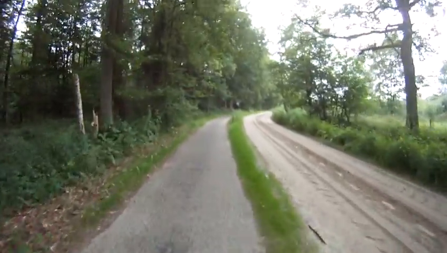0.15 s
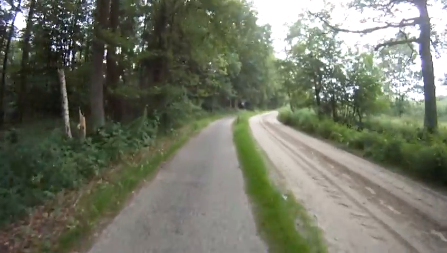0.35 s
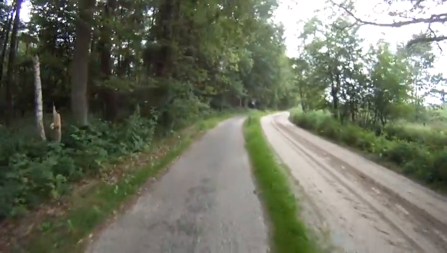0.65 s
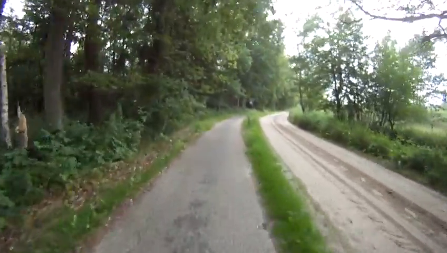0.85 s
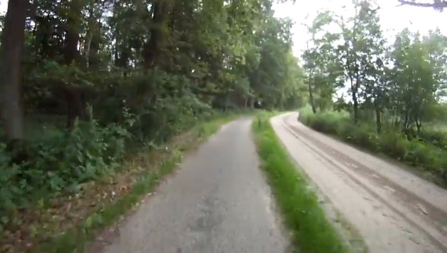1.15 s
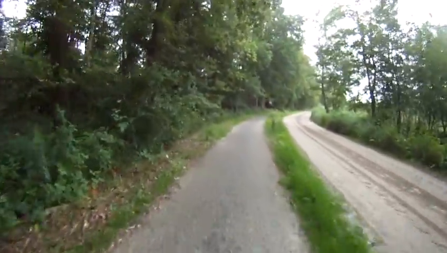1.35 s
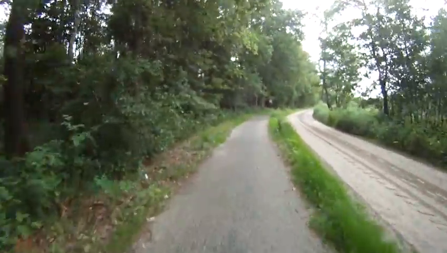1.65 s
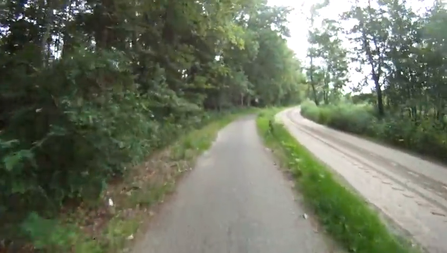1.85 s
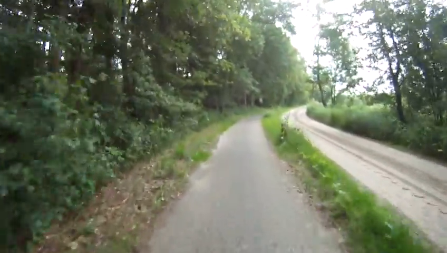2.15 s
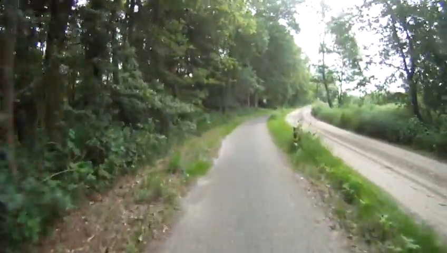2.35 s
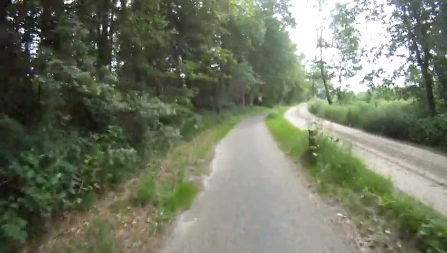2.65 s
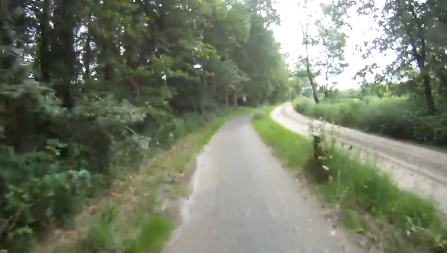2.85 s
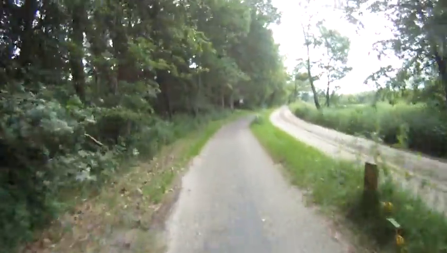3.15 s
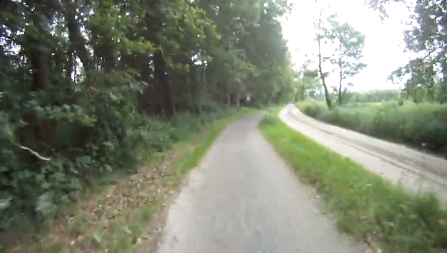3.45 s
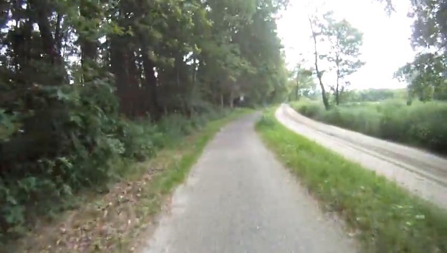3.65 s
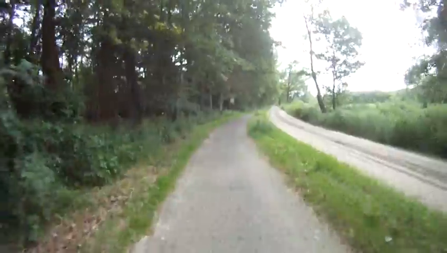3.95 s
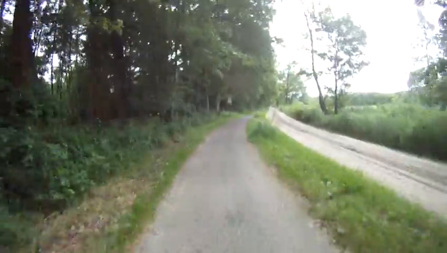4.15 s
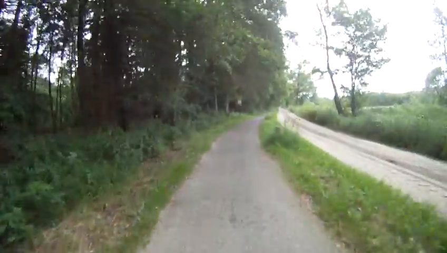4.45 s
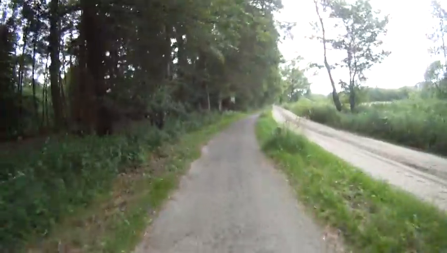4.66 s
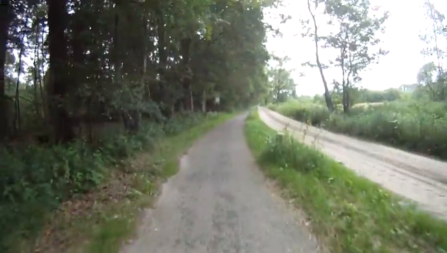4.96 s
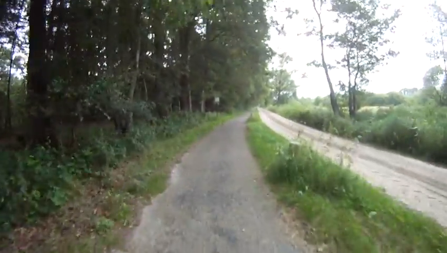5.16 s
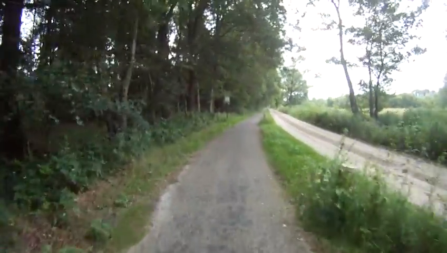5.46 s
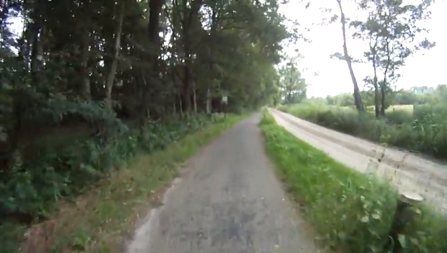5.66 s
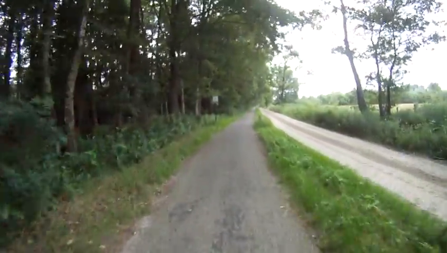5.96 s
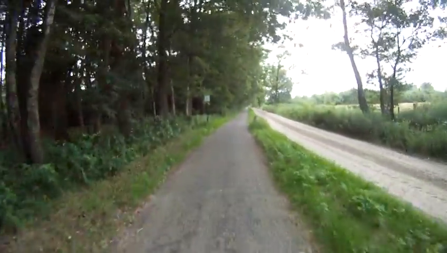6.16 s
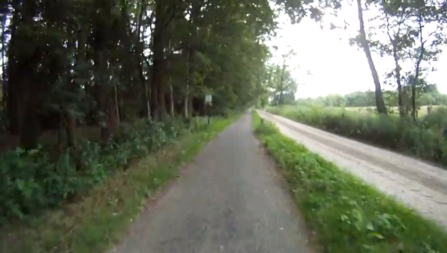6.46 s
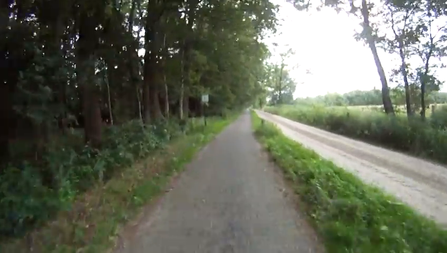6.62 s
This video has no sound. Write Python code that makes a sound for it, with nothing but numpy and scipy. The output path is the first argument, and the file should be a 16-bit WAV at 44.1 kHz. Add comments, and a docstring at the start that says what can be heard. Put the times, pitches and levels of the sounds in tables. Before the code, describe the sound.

A bicycle rolls over rough paving with a steady low roar and mount hum, wind buffeting, fine crackles and scattered sharp rattles.

```python
"""A low roar and a mount's hum come first: a bicycle rolls on a rough paved path, a small camera fixed to it.
The road's grain rings frame and mount; the tread hisses, brief crackles and dry ticks run along, a faint swish
comes and goes. Loose parts slap and chatter, the frame knocks low, and wind buffets the microphone in eddies.
The camera samples slowly and holds each sample, which mirrors the sound into a thin fizz."""
import sys
import numpy as np
from scipy import signal
from scipy.fft import rfft, irfft, next_fast_len
from scipy.io import wavfile
from scipy.ndimage import uniform_filter1d, map_coordinates

SR = 44100
rng = np.random.default_rng(int(sys.argv[2]) if len(sys.argv) > 2 else 0)


def store_pcm(level_fs):
    """Save levels as 16-bit WAV."""
    pcm = np.round(np.clip(level_fs, -1, 1) * 32767).astype(np.int16)
    wavfile.write(sys.argv[1], SR, np.atleast_2d(pcm).T)


N = 299437  # length in samples

# rise and fall shared by the hiss and the crackles: start_s, relative_level_db
TREBLE_LEVELS = [(0, -53.5), (.6, -54), (1.5, -53.5), (2.05, -49.5), (2.5, -49.5), (3.0, -56), (3.4, -50.5),
                 (4.6, -55), (6.0, -51), (6.3, -54), (6.79, -50.5)]


def amp(db):
    """Decibels to gain."""
    return 10 ** (np.asarray(db) / 20)


def unit(x):
    """Scale to rms 1."""
    return x / np.sqrt(np.mean(x ** 2) + 1e-20)


def curves(rows):
    """One value per sample for each column after the time, joined by straight lines."""
    knot_s, *columns = np.transpose(rows)
    t = np.arange(N) / SR
    return [np.interp(t, knot_s, column) for column in columns]


def swells(rows, half_s):
    """Bell-shaped rises in dB, one per (centre_s, rise_db) row, down to 1/e of the rise at half_s."""
    t = np.arange(N) / SR
    return sum(rise_db * np.exp(-((t - centre_s) / half_s) ** 2) for centre_s, rise_db in rows)


def wobble(rate):
    """A smooth random curve, rate knots a second."""
    knots = rng.standard_normal(int(N * rate / SR) + 4)
    return map_coordinates(knots, [np.arange(N) * rate / SR])


def filtered(x, response):
    """x with its spectrum multiplied by a response of frequency in Hz."""
    size = next_fast_len(len(x) + SR // 4)
    hz = np.fft.rfftfreq(size, 1 / SR)
    return irfft(rfft(x, size) * response(hz), size)[:len(x)]


def coloured(x, points):
    """x shaped by (frequency_hz, gain_db) points on a log frequency axis, at rms 1."""
    point_hz, point_db = np.transpose(points)

    def response(hz):
        return amp(np.interp(np.log(hz + 1), np.log(point_hz), point_db))

    return unit(filtered(x, response))


def resonate(x, modes):
    """x through a body's parallel resonances of alternating sign, at rms 1."""
    def response(hz):
        total = 0
        for k, (centre, width, db) in enumerate(modes):
            damping = 1j * hz * width
            total = total + (-1) ** k * amp(db) * damping / (centre * centre - hz * hz + damping)
        return total

    return unit(filtered(x, response))


def even(x, seconds):
    """x at a steady rms near 1, keeping only its quick flutter."""
    size = max(int(seconds * SR), 2)
    power = uniform_filter1d(uniform_filter1d(x * x, size), size)
    return x / np.sqrt(np.abs(power) + 1e-9)


def patchy(x, depth_db):
    """x with brief, narrow patches made louder or softer at random, at rms 1."""
    spectrum = signal.stft(x, nperseg=256)[2]
    field = uniform_filter1d(rng.standard_normal(spectrum.shape), size=3, axis=0)  # across frequency
    field = uniform_filter1d(field, size=5, axis=1)  # across time
    gain = amp(depth_db * np.clip(unit(field), -2, 2))
    return unit(signal.istft(spectrum * gain, nperseg=256)[1][:N])


def impacts(rate, spread_db):
    """Impulses at random times, rate a second, of random sign and log-normal size."""
    struck = rng.random(N) < rate / SR
    sign = np.sign(rng.standard_normal(N))
    return struck * sign * amp(spread_db * rng.standard_normal(N))


def rolling(waver_db=2.5):
    """The tyres strike the grain of the road; frame and mount ring with it, and harder on uneven spots."""
    # resonances of frame, low shudder and mount: centre_hz, width_hz, gain_db
    frame_modes = [(205, 39, -8.5), (277, 23.8, -2), (368.4, 35, 1.5), (454.4, 63.6, -3), (601, 57, -10.5),
                   (714.6, 110, -9.5), (886, 160, -16), (988, 68, -13), (1362, 170, -24.5),
                   (1970, 143, -24)]
    shudder_modes = [(40.4, 12.8, 0)]
    mount_modes = [(623.1, 17.2, 0)]
    # how hard the paving shakes the bicycle: start_s, fine_roughness_db, long_unevenness_db
    paving = [(0, 0.5, -2), (.55, -1, -4), (1.35, 0, 2), (2.0, 1.5, 0.5), (2.45, 1.5, 4), (2.7, -1, -0.5),
              (3.6, 0.6, 3.5), (4.3, -0.5, 2), (5.1, -.7, 1.5), (5.9, 0, 0), (6.55, -1, -5),
              (6.79, 0.5, -1)]
    # hum of the mount: start_s, level_db
    hum = [(0, -31.5), (.45, -37.5), (1.1, -33), (1.7, -32), (2.4, -35), (3.25, -33), (3.42, -41.5),
           (3.6, -32.5), (4.5, -34.5), (5.6, -35.5), (6.1, -36), (6.35, -31), (6.79, -33)]
    # uneven spots that jolt the mount into a louder hum: centre_s, rise_db
    jolts = [(0.89, 10.5), (2.32, 12), (2.935, 9.5), (3.51, 11), (3.67, 6.5), (3.97, 7.5), (4.14, 9.5),
             (4.71, 6), (5.405, 10), (5.69, 5.5), (6.28, 11.5), (6.48, 6)]
    # dips in the path that heave the whole frame: centre_s, rise_db
    heaves = [(0.3, 12), (0.94, 7), (3.64, 2), (4.13, 12), (4.45, 8), (5.52, 14), (5.79, 16), (6.01, 0)]

    rough_db, uneven_db = curves(paving)
    roar_db = -32.5 + rough_db
    hum_db = curves(hum)[0] + swells(jolts, half_s=0.018) + waver_db * wobble(16)
    shudder_db = -35 + uneven_db + swells(heaves, half_s=0.032)

    grain = unit(impacts(rate=1500, spread_db=4)) + amp(-5.0) * rng.standard_normal(N)
    frame = even(resonate(grain, frame_modes), seconds=0.21)
    mount = coloured(resonate(grain, mount_modes), [(300, -66), (560, 10.5), (700, 4.0), (1000, -3.0)])
    mount = even(mount, seconds=0.057)
    shudder = resonate(rng.standard_normal(N), shudder_modes)
    shudder = coloured(shudder, [(28, -15), (40, -9.5), (60, -14), (200, -24), (800, -56)])
    shudder = even(shudder, seconds=0.064)
    return amp(roar_db) * frame + amp(hum_db) * mount + amp(shudder_db) * shudder


def wind(gust_growth=1.45):
    """The airstream breaks into eddies at the microphone port; small, higher ones grow faster with its strength."""
    # spectrum of the large eddies: frequency_hz, gain_db
    wind_colour = [(15, -4.5), (30, -2), (70, -1), (100, -2.5), (160, -9.5), (250, -13), (500, -22.5),
                   (1200, -54.5)]
    # strength of the airstream at the microphone: start_s, relative_level_db
    airstream = [(0, -35), (.9, -36.5), (1.4, -33.5), (2.4, -34), (2.75, -36.5), (3.4, -34), (4.15, -31),
                 (4.9, -36), (5.4, -32), (5.8, -28), (6.25, -28.5), (6.79, -32.5)]
    # single eddies that hit the port: centre_s, rise_db
    gusts = [(5.52, 6), (5.8, 7.5), (6.01, 4.5), (6.5, 4.5)]

    buffet_db = curves(airstream)[0] + swells(gusts, half_s=0.018)
    large_db = buffet_db + 1 + 1.63 * wobble(22)
    large = even(coloured(rng.standard_normal(N), wind_colour), seconds=0.15)
    small_db = gust_growth * (buffet_db - buffet_db.max()) - 23.5
    small = coloured(rng.standard_normal(N), [(50, -24), (95, 5.5), (190, 0.5), (260, -28.0), (600, -52)])
    return amp(large_db) * large + amp(small_db) * small


def hiss():
    """The tread hisses on the paving as shaped noise; a faint grainy swish comes and goes."""
    # spectrum of the tread's hiss: frequency_hz, gain_db
    tread_colour = [(500, -43), (1000, -5), (1900, -3), (2250, -6.5), (2560, 1), (2780, -2.5), (3050, -7),
                    (3900, -6.5), (4300, -11.5), (5000, -17), (5600, -26)]
    # faint swish: start_s, level_db
    swish_levels = [(4.25, -67), (4.42, -43), (4.6, -61), (4.98, -49.5), (5.18, -54), (5.33, -55),
                    (5.46, -44), (5.54, -58)]
    # spectrum of the swish: frequency_hz, gain_db
    swish_colour = [(2200, -32), (2560, 0), (2880, 2), (3150, 3), (3500, 3), (3900, -14), (5000, -32)]

    treble_db, = curves(TREBLE_LEVELS)
    swish_db, = curves(swish_levels)
    tread_db = treble_db - 2.0 + 2.06 * wobble(11)
    tread = patchy(coloured(rng.standard_normal(N), tread_colour), depth_db=0.5)
    swish = patchy(coloured(rng.standard_normal(N), swish_colour), depth_db=8)
    return amp(tread_db) * tread + amp(swish_db) * swish


def crackles(count=560, burst_t60=0.027, spread_db=3.0):
    """Brief noisy crackles, each a shower of tiny cracks, ring at 1.3 to 4.7 kHz."""
    # resonances of the crackles: centre_hz, width_hz, gain_db
    crackle_modes = [(1300, 240, -2), (1920, 276, 1), (2510, 270, -3), (3020, 195, 1), (3546, 230, -1.5),
                     (4020, 190, -1.5), (4550, 170, -13.5), (4690, 290, -9.5)]

    treble_db, = curves(TREBLE_LEVELS)
    t = np.arange(SR // 20) / SR
    sizes = amp(spread_db * np.minimum(rng.standard_normal(count), 2))
    starts = np.bincount(rng.integers(0, N, count), sizes ** 2, N)
    burst = amp(-60 * t / burst_t60) * (1 - np.exp(-t / 0.0022))  # quick rise, then decay
    power = signal.fftconvolve(starts, burst ** 2)[:N]
    cracks = np.sqrt(np.abs(power)) * impacts(rate=6000, spread_db=2)
    return amp(treble_db + 4.0) * patchy(resonate(cracks, crackle_modes), depth_db=4.0)


def ticking(count=440):
    """Tiny dry ticks, each one a single impulse, run along at an uneven pace."""
    # ticking: start_s, relative_level_db
    tick_levels = [(0, -75), (2, -73.5), (3.1, -73), (3.6, -70), (5.4, -72), (6.79, -69)]
    # spectrum of a tick: frequency_hz, gain_db
    tick_colour = [(500, -34), (2000, -10), (4000, -4), (6000, -4.5)]

    tick_db, = curves(tick_levels)
    times = np.cumsum(rng.uniform(.5, 2, count))
    places = (times / times[-1] * N).astype(int)
    ticks = np.bincount(places, rng.uniform(0, .8, count), N)[:N]
    return amp(tick_db + 20) * coloured(ticks, tick_colour)


def rattles(chatter_db=-14, firmness=0.63, count=14):
    """A loose part slaps its stop and chatters; the harder the slap, the more it is one clean blow."""
    # resonances of the loose parts: centre_hz, width_hz, gain_db
    loose_modes = [(993, 195, 0), (1450, 116, 3.5), (1913, 260, -0.5), (3250, 360, -20), (3630, 370, -17)]
    # rattles at set times, loud and soft:
    # start_s, relative_peak_db, relative_brightness_db, relative_2khz_ring_db
    timed = [(0.0131, -23.5, -22, -20), (0.04, -17, -43, -12), (0.0723, -21.5, -19, -8.5),
             (0.0877, -22, -34, -27), (0.1615, -28, 2, -10), (0.3842, -28.5, -22, -22),
             (0.6774, -29, -8, -17), (1.2103, -29, 7, -19), (1.353, -23, -32, -23), (1.4227, -34, -19, -24),
             (1.8366, -9, -24, -4.5), (1.9856, -24, -31, -9), (2.1325, -20, -8, -4), (2.177, -28, -7, -5),
             (2.2004, -22, -22, -10), (2.2975, -21, -3, -5), (2.5316, -21.5, 8, -1),
             (2.7252, -24, -0.5, -10), (3.1567, -30.5, 3, -14), (3.682, -32, -29, -20),
             (4.182, -25.5, 4, -3), (4.4083, -30, 20, -16), (5.864, -22.5, 1, 3), (5.922, -26.5, -12, -9),
             (6.4657, -25, 3, -4), (6.5994, -26.5, -13, -13)]
    # mean and spread of rattles at random times: relative_peak_db, relative_brightness_db, relative_2khz_ring_db
    random_mean = (-33, -2.7, -14)
    random_spread = (1, 6.2, 4)
    clean_db = -38.5  # relative peak at which the chatter starts at chatter_db
    chatter_t60 = 0.044  # s

    out = np.zeros(N + SR)
    t = np.arange(SR // 12) / SR
    lead = SR // 700  # samples of silence ahead of the contact
    random_s = rng.integers(lead, N, count) / SR
    scattered = np.column_stack([random_s, rng.normal(random_mean, np.abs(random_spread), (count, 3))])
    for start_s, db, bright_db, ring_db in [*timed, *scattered]:
        decay_db = chatter_db - firmness * (db - clean_db) - 60 * t / chatter_t60
        chatter = amp(decay_db) * rng.standard_normal(len(t))
        contact = np.pad((t == 0) + chatter, (lead, 0))
        # each contact has its own balance of ring and upper resonances
        balance = [(500, 2.5), (1000, -1.8), (1500, -0.84), (2000, ring_db + 11),
                   (2900, bright_db + 16.5), (4600, bright_db + 13.5), (5600, bright_db + 3.5)]
        ring = coloured(resonate(contact, loose_modes), balance)
        first = round((start_s + .0008) * SR) - lead
        out[first:][:len(ring)] += amp(db + 0.5) * ring / np.abs(ring).max()
    return out[:N]


def frame_knocks():
    """The frame knocks and rings after wheel bumps and a hard rattle, each a decaying sine with a fast onset."""
    # low knocks and ringing of the frame, after wheel bumps and a hard rattle:
    # start_s, level_db (before onset and decay), ring_hz, t60_s
    knocks = [(1.878, -20, 358, 0.061), (2.2975, -10, 580, 0.021), (2.2977, -17.5, 954, 0.017),
              (2.309, -16, 540, 0.028), (2.4026, -14, 402, 0.063), (2.4165, -13, 378, 0.12)]

    out = np.zeros(N + SR)
    t = np.arange(SR // 4) / SR
    for start_s, db, hz, t60 in knocks:
        envelope = amp(db - 60 * t / t60) * (1 - np.exp(-t / 0.0005))
        out[round(start_s * SR):][:len(t)] += envelope * np.sin(2 * np.pi * hz * t)
    return out[:N]


def scene():
    """Everything reaches one microphone on the bicycle."""
    road = rolling() + hiss() + crackles() + ticking()
    return (road + wind() + rattles() + frame_knocks())[None]


def record(dry):
    """Holding each slow sample mirrors the sound on both sides of the sampling rate and dulls the top."""
    hold_hz, top_hz = 12000, 15400  # slow sampling rate, upper limit of the result

    def input_limit(hz):
        return (hz < hold_hz / 2) / np.sqrt(1 + (hz / 5500) ** 40)

    def hold_droop(hz):
        # each sample is repeated four times
        droop = np.sinc(hz / hold_hz) / np.sinc(hz / (4 * hold_hz))
        return droop * (hz < top_hz)

    band = filtered(dry[0], input_limit)
    mirrored = band * (1 + 2 * np.cos(2 * np.pi * hold_hz * np.arange(N) / SR))
    return filtered(mirrored, hold_droop)[None]


dry = scene()
out = record(dry)
store_pcm(out)
```